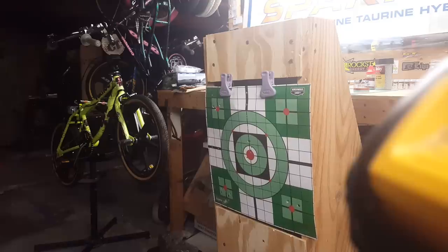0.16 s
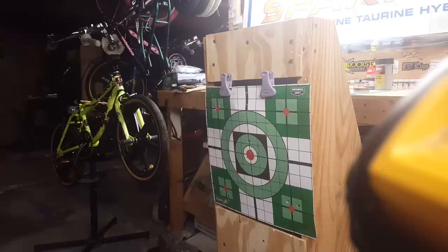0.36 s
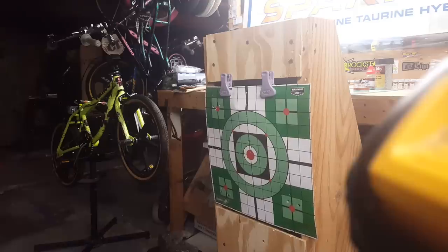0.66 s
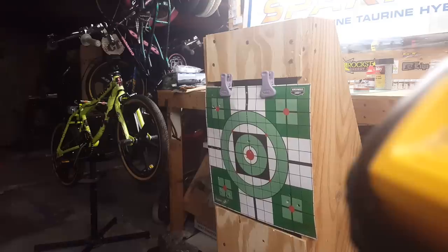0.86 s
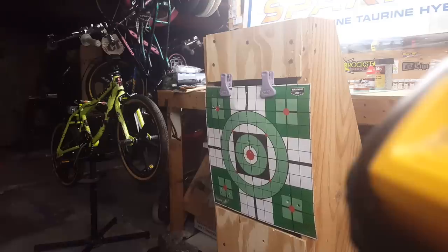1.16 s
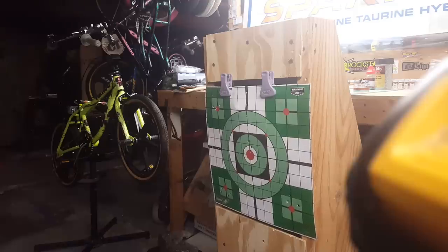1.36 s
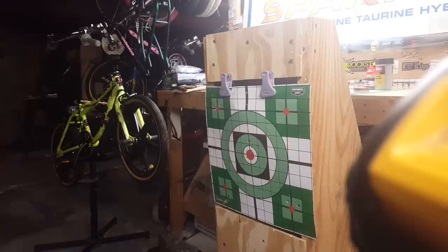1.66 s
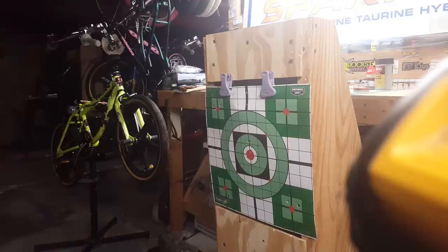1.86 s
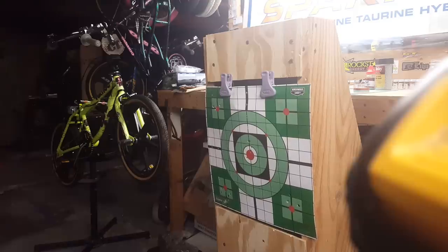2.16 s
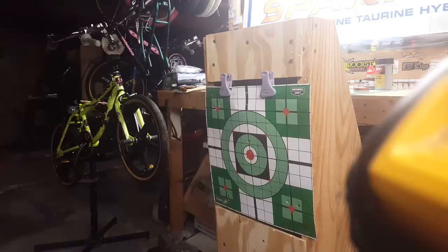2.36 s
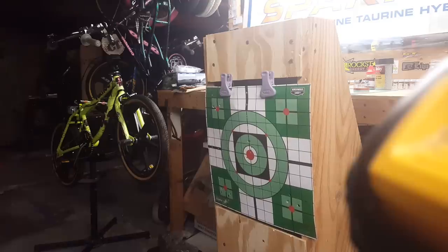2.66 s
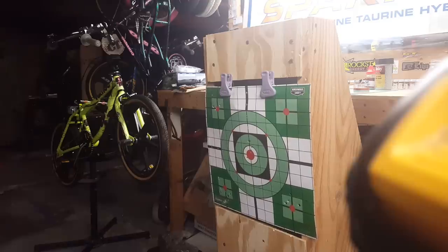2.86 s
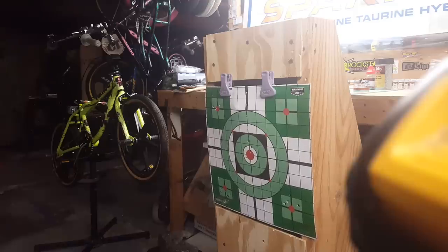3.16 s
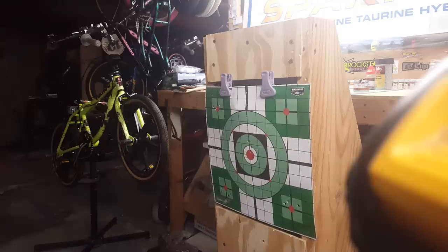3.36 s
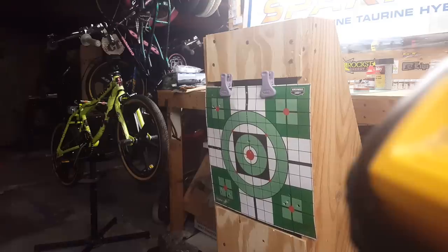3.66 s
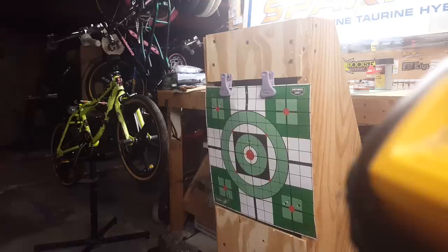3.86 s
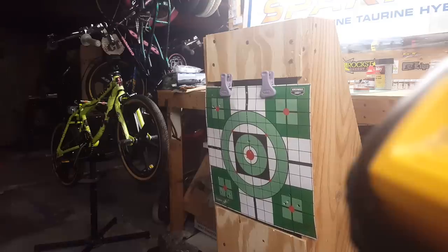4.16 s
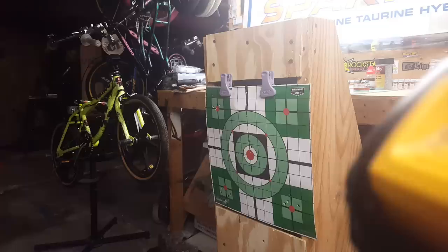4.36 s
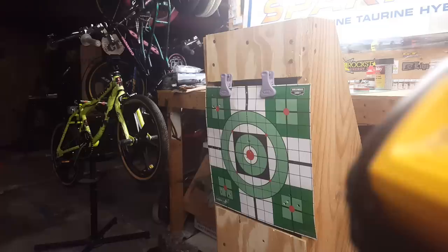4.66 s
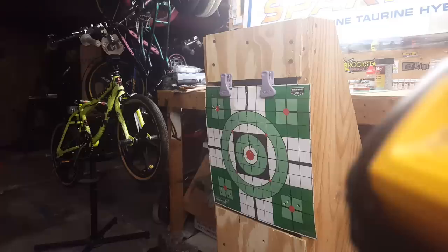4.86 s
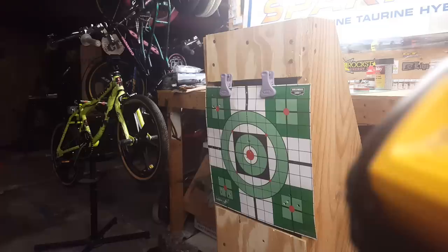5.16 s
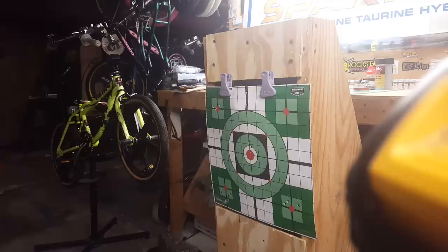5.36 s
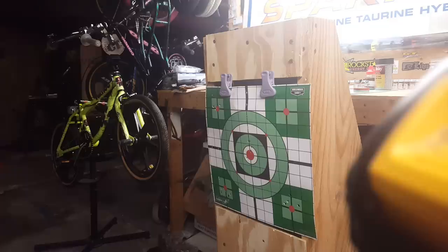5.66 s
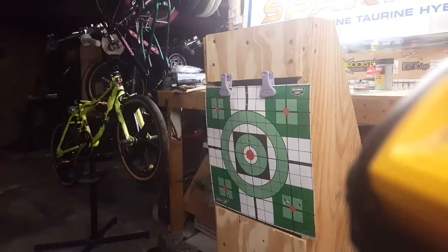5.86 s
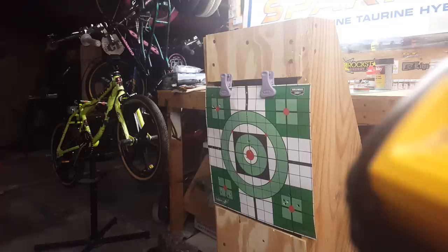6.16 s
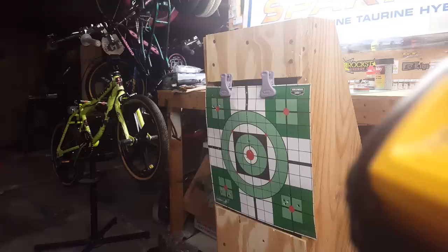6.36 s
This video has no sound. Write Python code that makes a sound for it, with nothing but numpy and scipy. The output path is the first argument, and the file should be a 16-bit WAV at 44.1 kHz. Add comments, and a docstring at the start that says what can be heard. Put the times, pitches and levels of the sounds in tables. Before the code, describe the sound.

From next to a plywood backstop in a garage, three spaced air revolver shots crack out, each merging with the woody smack of the pellet and a short room echo. The gun's metal rings briefly, most clearly on the last shot. Between shots the trigger clicks faintly in the distance. Spent pellets drop softly close by after the first and third hits, over a quiet, low airy hum and hiss.

```python
"""A garage, heard from beside a paper target on a plywood backstop: an air revolver fires three pellets.
Each gas report arrives first and sets the gun's steel ringing; some 45 ms later the pellet smacks the board.
The action clicks far away after each shot. Spent pellets drop nearby after the first and the last,
and one whirs as it glances off. The room rings over a low steady rush of air, all under a limiter."""
import sys
import numpy as np
from scipy import signal
from scipy.fft import rfft, irfft, next_fast_len
from scipy.io import wavfile
from scipy.ndimage import uniform_filter1d

SR = 44100
rng = np.random.default_rng(int(sys.argv[2]) if len(sys.argv) > 2 else 0)


def master_out(mix):
    """Clip the mix to full scale and print it as 16-bit PCM to the path in sys.argv[1]."""
    frames = np.transpose(np.atleast_2d(mix))
    ceiling = np.clip(frames, -1, 1)
    pcm = np.round(ceiling * 32767).astype(np.int16)
    wavfile.write(sys.argv[1], SR, pcm)


N = 287528
RING_SIZE, CUTOFF_HZ = 32768, 16000

# the three discharges: (time [s], level [dB], treble [dB], bass [dB], steel ring [dB])
SHOTS = [(0.5657, -9, 0.5, -5.5, -5), (2.8528, -2, 5, -4.5, -3.5), (5.8841, -8, -5, -2, 5)]


def gas_reports():
    """Each shot lets out a burst of gas that cracks across the garage."""
    # tone of the burst: (frequency [Hz], level [dB])
    spectrum = [(21, -49.5), (35, -20), (171, 1), (309, -9), (587, 3.5), (1140, -4.5), (2220, -2),
                (5050, -7), (5590, -8.5), (8430, -8), (10600, -13.5), (14800, -12), (16000, -20)]
    # its resonances: (centre [Hz], width [Hz], boost [dB])
    peaks = [(199.8, 35, 8.5), (595, 35, 1), (2466, 190, 2.5), (4260, 180, 4.5)]
    # first arrivals from the muzzle: (delay [s], level [dB], right-side lag [s])
    paths = [(0, 15.5, .0004), (.0013, 8.5, .0004), (0.0151, 11, .0004)]
    return blows(SHOTS, paths, spectrum, peaks, build_s=0.014, pan_db=6.5)


def gun_ring(steel_t60_s=.32):
    """Each discharge pops at the muzzle and sets the steel ringing, which swells as it fills the room."""
    # the pop of air: (frequency [Hz], level [dB], t60 [s])
    muzzle_modes = [(560, -10.5, 0.0036), (716, -3, 0.027), (2350, -1.5, 0.009)]
    # partials of the barrel and frame: (frequency [Hz], level [dB])
    steel_partials = [(1696, -22.5), (2379, -18), (2891, -19.5), (4290, -20), (4996, -24.5), (5588, -22.5),
                      (6476, -24), (6918, -13.5), (7332, -20.5), (7542, -22), (7768, -24.5), (8516, -26.5),
                      (8662, -20), (9184, -19), (9302, -17.5), (9507, -22), (10347, -26), (10594, -26),
                      (11117, -23.5), (11504, -22), (11693, -24.5), (12764, -29)]
    steel_modes = [(hz, db, steel_t60_s) for hz, db in steel_partials]
    out = np.zeros((2, N))
    for s, db, _, _, ring_db in SHOTS:
        pop = ring(muzzle_modes, swell_s=0.00091, pan_db=2.0)
        steel = from_db(ring_db) * ring(steel_modes, swell_s=0.029)
        add(out, s, from_db(db) * (pop + steel))
    return out


def backstop_hits():
    """Pellets smack the plywood; the spot struck decides how much its low and hollow modes ring."""
    # the strikes: (time [s], level [dB], treble [dB], bass [dB], hollow ring [dB])
    hits = [(0.6017, -7, -2, -7.5, -29.5), (2.903, -9.5, -4, 3, -10), (5.9349, -9, -3.5, 1.5, -20)]
    # tone of the smack: (frequency [Hz], level [dB])
    spectrum = [(21, -63), (35, -53.5), (111, -28.5), (167, -7), (233, -1.5), (420, -7.5), (466, -6.5),
                (684, -4), (798, -4.5), (1000, -4), (1680, -7.5), (2460, -5), (5320, -8), (7050, -7.5),
                (16000, -15.5)]
    # the board's peaks and notches: (centre [Hz], width [Hz], gain [dB])
    peaks = [(177, 22, 8), (240, 75, -9.5), (296, 130, 6.5), (417.4, 16, 10), (700, 57, 1), (810, 92, -3.5),
             (957, 110, 6.5), (1310, 120, 2)]
    # first arrivals from the board: (delay [s], level [dB], right-side lag [s])
    paths = [(0, 15, .0001), (.0035, 16, .0001)]
    # the woody knock and the slow hollow ring: (frequency [Hz], level [dB], t60 [s])
    board_modes = [(82, -22, 0.068), (176, -16, 0.25), (284, -13.5, 0.14), (324, -15.5, 0.22),
                   (614, -16.5, 0.067), (983, -8, 0.039), (1234, -10, 0.029), (1410, -7, 0.09),
                   (1530, -7.5, 0.099)]
    hollow_modes = [(612, -5, .3), (672, 0, .32), (728, -3, .32)]
    out = blows(hits, paths, spectrum, peaks, build_s=0.0067, pan_db=1.0)
    for s, db, _, bass_db, hollow_db in hits:
        modes = [(hz, mode_db + bass_db * (hz < 400), t60) for hz, mode_db, t60 in board_modes]
        knock = ring(modes, swell_s=0.0015)
        hollow = from_db(hollow_db) * ring(hollow_modes, swell_s=.04)
        add(out, s, from_db(db) * (knock + hollow))
    return out


def action_clicks(settle_after_s=.281, settle_db=-51):
    """After every shot the action settles with a faint tick; then the trigger springs back."""
    # trigger returns, the first in two steps: (time [s], level [dB])
    returns = [(1.069, -57), (1.159, -47.5), (3.477, -41.5), (6.469, -45.5)]
    # tone of a click: (frequency [Hz], level [dB])
    spectrum = [(100, -23), (1100, -13), (1800, 3.5), (4500, -3), (7000, -5.5), (10000, -11.5),
                (16000, -12)]
    # the action's resonance: (centre [Hz], width [Hz], boost [dB])
    peaks = [(4380, 1600, 3.5)]
    # first arrivals from the gun: (delay [s], level [dB], right-side lag [s])
    paths = [(0, 6.1, 0.00043), (.0013, 5.3, 0.00081)]
    settles = [(s + settle_after_s, settle_db) for s, *_ in SHOTS]
    return blows(settles + returns, paths, spectrum, peaks, build_s=0.012, pan_db=5.5)


def spent_pellets(ping_db=7.0, ping_cycles=10.0, room_t60_s=0.15):
    """Small close ticks: the thing struck pings, the room follows; a softer landing is duller and lower."""
    # the landings: (time [s], level [dB], brightness [Hz])
    drops = [(0.8608, -43, 2000), (0.943, -39, 15000), (6.274, -51, 3000), (6.3169, -47.5, 3200),
             (6.343, -48, 3200), (6.369, -39.5, 2700)]
    # tone of a tick: (frequency [Hz], level [dB])
    spectrum = [(80, -4), (300, -2.5), (800, -3.5), (2000, 0), (5000, -2.5), (8000, 2), (16000, -13)]
    # its resonances: (centre [Hz], width [Hz], boost [dB])
    peaks = [(754, 170, 6.2), (1415, 100, 10.3), (2540, 300, 3.8)]
    # first arrivals from a landing: (delay [s], level [dB], right-side lag [s])
    paths = [(0, 8.1, .0001), (.001, 22, 0.000058), (.0024, 12, .0002)]
    out, t = np.zeros((2, N)), np.arange(RING_SIZE) / SR
    for s, db, bright_hz in drops:
        pulse = arrivals(paths, pan_db=8.0) + diffuse(RING_SIZE) * from_db(-60 * t / room_t60_s)
        pitch_hz = 0.68 * bright_hz
        ping = ring([(pitch_hz, ping_db, ping_cycles / pitch_hz + .002)], swell_s=.0002)
        rattle = 0.71 / (1 + (bright_hz / 5500) ** 2)  # dull landings rattle, a hard one ticks cleanly
        tick = sputter(colour(pulse, spectrum, peaks) + ping, share=rattle, decay_s=.005)
        softness = signal.butter(3, min(bright_hz, CUTOFF_HZ), fs=SR, output="sos")
        add(out, s, from_db(db) * signal.sosfilt(softness, tick))
    return out


def pellet_whir(start_s=.858, length_s=0.062, start_hz=476, sag_hz_per_s=3660, level_db=-55):
    """A glancing pellet whirs briefly, falling in pitch as its spin slows."""
    out, t = np.zeros((2, N)), np.arange(round(length_s * SR)) / SR
    hum = np.sin(2 * np.pi * np.cumsum(start_hz - sag_hz_per_s * t) / SR)
    swell = np.sin(np.pi * t / length_s)
    add(out, start_s, from_db(level_db) * (hum * swell)[None])
    return out


def air_rush(level_db=-53, dip_at_s=1.08, dip_db=-7, sink_s=.2, recover_s=0.34):
    """A low bed of rushing air with hiss on top, dipping once; part of it comes straight from the left."""
    # tone of the rush: (frequency [Hz], level [dB])
    spectrum = [(15, -42), (25, -14), (87, -4.5), (145, -5.5), (229, -12.5), (416, -11.5), (451, -15),
                (775, -13.5), (840, -15), (1160, -18.5), (2550, -25.5), (4370, -31.5), (8140, -31.5),
                (10400, -41), (16000, -39.5)]
    # its resonances: (centre [Hz], width [Hz], boost [dB])
    peaks = [(81.5, 15, 3.2), (846, 60, 4.4)]
    since = np.arange(N) / SR - dip_at_s
    dip = np.exp(-np.where(since < 0, (since / sink_s) ** 2, since / recover_s))
    air = rng.standard_normal(N)
    from_left = np.array([air, np.roll(air, round(.00043 * SR))])
    return from_db(level_db + dip_db * dip) * colour(diffuse(N) + 0.36 * from_left, spectrum, peaks)


def blows(events, paths, spectrum, peaks, build_s, pan_db):
    """Impulses (time [s], level [dB], optional treble and bass [dB]) in the room, in the source's tone."""
    out = np.zeros((2, N))
    for s, db, *shelves_db in events:
        pulse = sputter(arrivals(paths, pan_db) + reverberation(build_s))
        add(out, s, from_db(db) * colour(pulse, spectrum, peaks, *shelves_db[:2]))
    return out


def ring(modes, swell_s, pan_db=0):
    """Decaying sines; the higher the mode, the more its phase differs between the sides."""
    t, out = np.arange(RING_SIZE) / SR, 0
    for hz, db, t60 in modes:
        phase = rng.standard_normal((2, 1)) * hz / 1500
        decay = from_db(db + rng.standard_normal() - 60 * t / t60)
        out = out + decay * np.sin(2 * np.pi * hz * t + phase)
    return out * (1 - np.exp(-t / swell_s)) * from_db([[pan_db / 2], [-pan_db / 2]])


def sputter(x, share=0.47, decay_s=0.0051):
    """A few ms of bright crackle follow a blow and make its spectrum uneven."""
    crackle = np.exp(-np.arange(512) / (decay_s * SR)) * rng.standard_normal(512)
    crackle = signal.lfilter([1, -1], [1, -.88], crackle)
    burst = share * crackle / np.linalg.norm(crackle)
    burst[0] += 1  # the blow itself
    return signal.fftconvolve(x, burst[None] / np.linalg.norm(burst))[:, :x.shape[1]]


def arrivals(paths, pan_db, thin_hz=260):
    """The straight path and first reflections as single pulses; thin, since the room supplies the bass."""
    out = np.zeros((2, RING_SIZE))
    for delay, db, lag in paths:
        out[0, round(delay * SR)] += from_db(db + pan_db)
        out[1, round((delay + lag) * SR)] += from_db(db)
    return signal.sosfilt(signal.butter(1, thin_hz, "high", fs=SR, output="sos"), out + 1e-18)


def reverberation(build_s, lumpy_db=2.0, merge_s=0.13):
    """Reflections start grainy, merge into a wash, then die octave by octave."""
    # decay of the garage: (frequency [Hz], t60 [s])
    room_t60 = [(50, 0.23), (110, 0.17), (180, 0.24), (320, 0.26), (650, 0.32), (1200, 0.3), (2500, 0.3),
                (5000, 0.27), (9000, 0.23), (15000, 0.2)]
    centres, t60s = np.transpose(room_t60)
    t, tail = np.arange(RING_SIZE) / SR, 0
    field = rfft(diffuse(RING_SIZE))
    hz = np.arange(field.shape[1]) * SR / RING_SIZE
    for t60, weights in zip(t60s, np.eye(len(centres))):
        band = at_hz(list(zip(centres, weights)), hz)
        tail = tail + irfft(field * band) * from_db(-60 * t / t60)
    grain = np.repeat(rng.standard_normal(RING_SIZE // 8), 8)
    spread = np.log(from_db(lumpy_db)) * np.exp(-t / merge_s)
    build_up = 1 - np.exp(-t / build_s) / 2
    return tail * np.exp(spread * grain - spread ** 2) * build_up


def diffuse(size):
    """White noise from all around at two spaced microphone ports: centred bass, wide treble."""
    # likeness of left and right: (frequency [Hz], correlation [-1..1])
    likeness = [(60, 1), (180, .83), (330, .62), (650, .15), (1300, -.22), (2400, .05), (5000, 0.046),
                (16000, .1)]
    mid, side = rfft(rng.standard_normal((2, size)))
    alike = at_hz(likeness, np.arange(len(mid)) * SR / size)
    return irfft(np.sqrt((1 + alike) / 2) * mid + np.sqrt((1 - alike) / 2) * side * [[1], [-1]], size)


def colour(x, spectrum, peaks, treble_db=0, bass_db=0):
    """An EQ of unit power: a tone curve, two shelves, and resonances that ring on."""
    # peak and notch of the microphone ports: (centre [Hz], width [Hz], gain [dB])
    port_peaks = [(8200, 820, 5), (10400, 1800, -1.5)]
    size = 2 * next_fast_len(x.shape[1] // 2 + 4096)
    hz = np.arange(size // 2 + 1) * SR / size
    db = at_hz(spectrum, hz)
    db += treble_db * hz ** 2 / (hz ** 2 + 3000 ** 2)
    db += bass_db / (1 + (hz / 380) ** 4)
    for centre, width, height in [*peaks, *port_peaks]:
        db += height / (1 + (2 * (hz - centre) / width) ** 2)
    gain = from_db(db)
    # folding the cepstrum gives minimum phase, so nothing sounds early
    cepstrum = irfft(np.log(gain / np.sqrt(np.mean(gain ** 2))))
    cepstrum[1:size // 2] *= 2
    cepstrum[size // 2 + 1:] = 0
    return irfft(rfft(x, size) * np.exp(rfft(cepstrum)))[:, :x.shape[1]]


def from_db(db):
    """Decibels to gain."""
    return 10 ** (np.asarray(db) / 20)


def at_hz(points, hz):
    """Read a curve on a log-frequency axis."""
    f, value = np.transpose(points)
    return np.interp(np.log(np.maximum(hz, 1)), np.log(f), value)


def add(out, s, sound):
    """Mix a sound in at s seconds."""
    i = round(s * SR)
    out[:, i:i + sound.shape[1]] += sound[:, :N - i]


def released(db, db_per_s):
    """Instant attack, steady release."""
    ramp = db_per_s * np.arange(N) / SR
    return np.maximum.accumulate(db + ramp) - ramp


def smooth(x, lag_s):
    """One-pole lag."""
    r = np.exp(-1 / (lag_s * SR))
    return signal.lfilter([1 - r], [1, -r], x)


def scene(balance_db=.8):
    """Shots, strikes, small sounds and air, with the rumble cut and the left side a little louder."""
    shots = gas_reports() + gun_ring() + backstop_hits()
    mix = shots + action_clicks() + spent_pellets() + pellet_whir() + air_rush()
    low_cut = signal.butter(3, 46, "high", fs=SR, output="sos")
    return signal.sosfilt(low_cut, mix) * from_db([[balance_db / 2], [-balance_db / 2]])


def record(dry, limit_db=-10.5, duck_db=5.5):
    """A fast limiter flattens the shots, a slow gain control ducks after them, and the top is cut."""
    power = uniform_filter1d(np.mean(dry ** 2, axis=0), size=180)
    level_db = 10 * np.log10(np.maximum(power, 1e-12))
    over_db = np.maximum(level_db - limit_db, 0)
    fast_db = smooth(released(over_db, db_per_s=142.5), lag_s=0.00027)
    slow_db = smooth(released(duck_db * np.tanh(over_db), db_per_s=6.5), lag_s=0.21)
    soft_clipped = 1.1 * np.tanh(dry * from_db(-fast_db - slow_db) / 1.1)
    high_cut = signal.ellip(12, .2, 90, CUTOFF_HZ, fs=SR, output="sos")
    return signal.sosfilt(high_cut, soft_clipped)


dry = scene()
out = record(dry)
master_out(out)
```